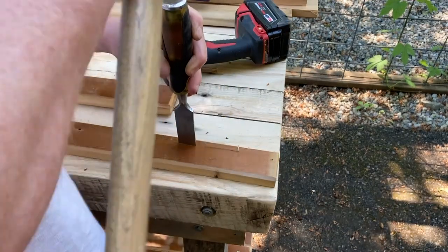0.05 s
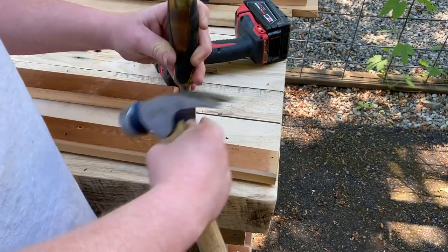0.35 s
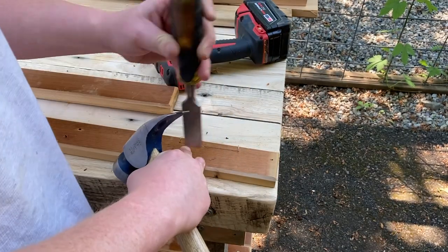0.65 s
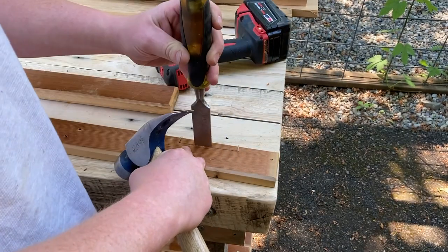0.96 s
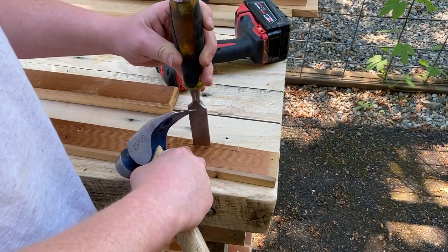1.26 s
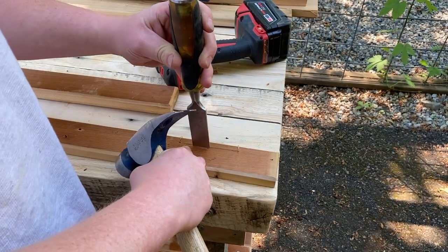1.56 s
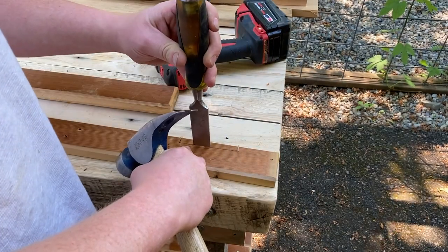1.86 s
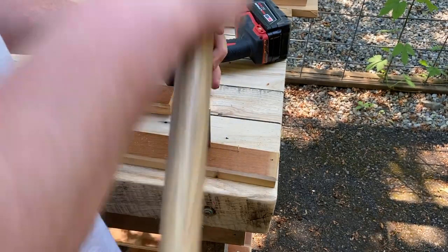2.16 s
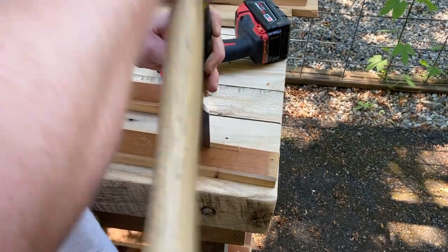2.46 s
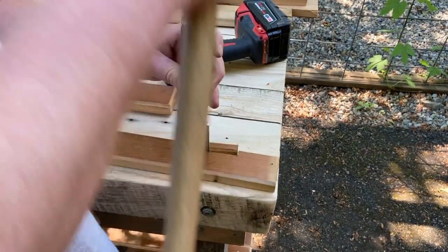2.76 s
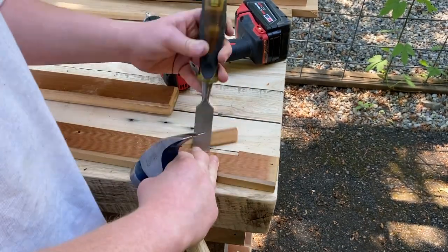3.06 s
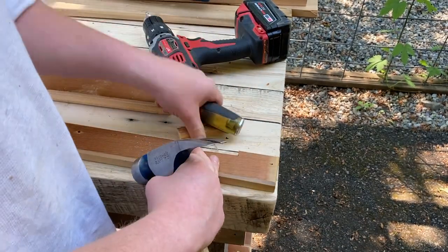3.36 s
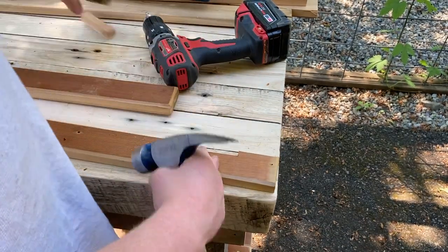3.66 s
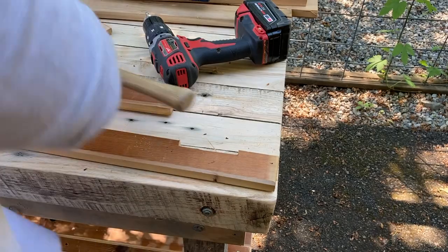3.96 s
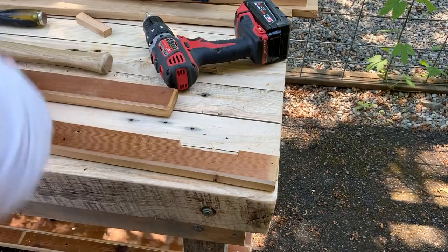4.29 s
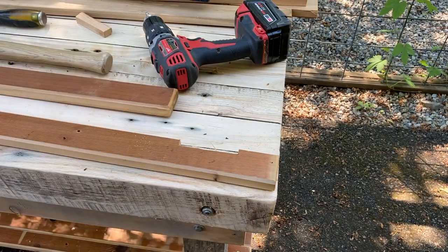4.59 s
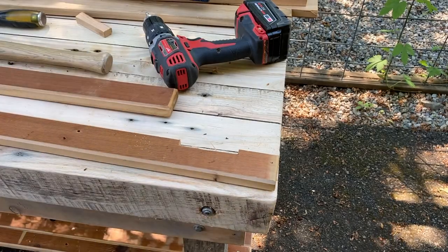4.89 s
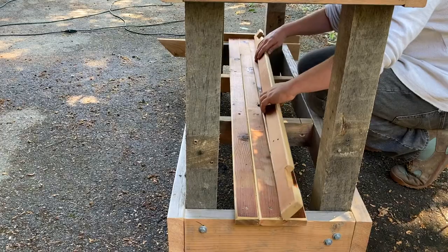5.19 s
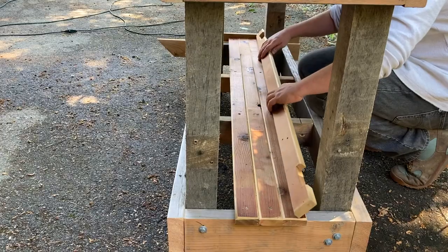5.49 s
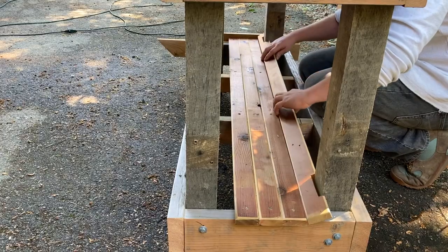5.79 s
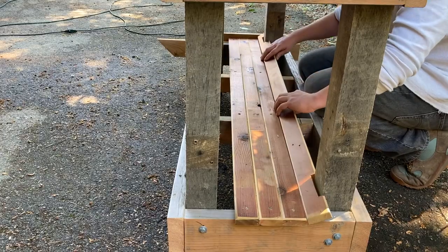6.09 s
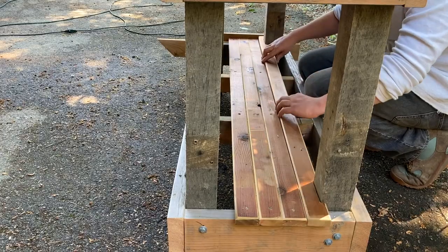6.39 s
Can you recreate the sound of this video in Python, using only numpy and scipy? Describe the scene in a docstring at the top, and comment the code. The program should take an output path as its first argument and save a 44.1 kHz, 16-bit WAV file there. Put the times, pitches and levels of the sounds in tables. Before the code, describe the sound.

Right at the start, a hammer strikes a chisel twice in quick succession, close by, each blow a sharp crack with a slight wooden thud. A low murmur of distant traffic fills the open yard throughout. A very faint engine hums until about 2 seconds, and a far bird gives six quick, faint chirps between 1.2 and 2 seconds. Three more chisel blows come from 2.3 to 2.7 seconds. At 3 seconds a chip snaps off, followed by light ticks of tools touching wood. From 4 to 4.4 seconds the hammer clatters and bounces to rest on planks, with one more click near 4.7. From 5.2 seconds, over a low distant rumble, a board scrapes along a wooden frame in short, gritty shoves, bumping softly at 5.3 and 5.8. It squeaks faintly, then lands with a firm, hollow knock at about 6.4 seconds.

```python
"""Woodwork in a yard

Over a murmur of traffic and a faint engine, a hammer drives a chisel into a batten in two short groups
of blows, exciting the damped modes of blade and bench. A chip snaps off, a far bird calls, the tools are
put down and the hammer rattles to rest on the planks by inelastic bounces. Then, over a distant rumble,
a board slides along a wooden frame with stick-slip friction and is knocked into place."""
import sys
import numpy as np
from scipy import signal
from scipy.fft import rfft, irfft, next_fast_len
from scipy.io import wavfile
from scipy.ndimage import uniform_filter1d, map_coordinates

SR = 44100
rng = np.random.default_rng(int(sys.argv[2]) if len(sys.argv) > 2 else 0)


def transcribe(signal):
    """Save signal, clipped to [-1, 1], as a 16-bit WAV file at the path in sys.argv[1]."""
    frames = np.atleast_2d(signal).T
    limited = np.clip(frames, -1, 1)
    pcm = np.round(limited * 32767).astype(np.int16)
    wavfile.write(sys.argv[1], SR, pcm)


N = 288414
T = np.arange(N) / SR
AGE = T[:SR // 6]  # time since an impact, t/s


def amp(db):
    """Amplitude ratio of a level in decibels; all tabulated levels are relative."""
    return 10 ** (np.asarray(db) / 20)


def unit_rms(x):
    """Normalisation to an rms of 1."""
    return x / np.sqrt(np.mean(x ** 2) + 1e-20)


def unit_impact(x):
    """Normalisation to the energy of 10 ms at an rms of 1."""
    return x / np.sqrt(np.sum(x ** 2) / (SR / 100))


def along(points, hz):
    """Interpolation of (f/Hz, value) points on a logarithmic frequency axis."""
    f, values = np.transpose(points)
    return np.interp(np.log(hz + 1), np.log(f + 1), values)


def curves(rows, t=T):
    """Linear interpolation in time of each column after the first."""
    times, *columns = np.transpose(rows)
    return [np.interp(t, times, column) for column in columns]


def wobble(rate):
    """Smooth random modulation: a spline through `rate` Gaussian values a second."""
    return map_coordinates(rng.standard_normal(int(N * rate / SR) + 4), [T * rate])


def filtered(x, response):
    """Linear filtering: the spectrum is multiplied by a complex frequency response."""
    n = x.shape[-1]
    padded = next_fast_len(n + SR // 5)
    return irfft(rfft(x, padded) * response(np.fft.rfftfreq(padded, 1 / SR)), padded)[..., :n]


def shelf(x, gain_db, corner_hz, order=4):
    """Shelving filter: a gain above the corner, or below it for a negative order."""
    return filtered(x, lambda hz: amp(gain_db / (1 + (corner_hz / (hz + 1)) ** order)))


def add(track, t, x):
    """Superposition of x on the track from time t."""
    part = track[max(round(t * SR), 0):][:len(x)]
    part += x[:len(part)]


def ring(modes, rise_s):
    """Free vibration: damped modes, excited with new strengths and phases by each blow."""
    hz, db, t60 = np.transpose(modes)[:, :, None]
    phase = 2 * np.pi * (hz * AGE + rng.random(hz.shape))
    waves = amp(db + rng.normal(0, 2, hz.shape) - 60 * AGE / t60) * np.sin(phase)
    return unit_impact(waves.sum(0) * (1 - np.exp(-AGE / rise_s)))


def burst(spectrum, rise_s, band_count=18):
    """Modal overlap: dense modes act as noise bands, each with its own decay; low bands rise slower."""
    spectrum = np.asarray(spectrum)
    centres = np.geomspace(70, 16000, band_count)
    hz = np.fft.rfftfreq(len(AGE), 1 / SR) + 1
    bands_away = np.abs(np.log(hz) - np.log(centres)[:, None]) / np.log(centres[1] / centres[0])
    masks = np.sqrt(np.clip(1 - bands_away, 0, 1))
    bands = irfft(rfft(rng.standard_normal(len(AGE))) * masks, len(AGE))
    decay = np.exp(-np.log(1000) * AGE / along(spectrum[:, ::2], centres)[:, None])
    attack = 1 - np.exp(-AGE / (rise_s + 1 / centres[:, None]))
    bands = bands * decay * attack
    gains = amp(along(spectrum[:, :2], centres)) * np.sqrt(centres) / np.linalg.norm(bands, axis=1)
    return unit_impact((gains[:, None] * bands).sum(0))


# Direction cues of the two work places: f/Hz, left-minus-right level/dB, phase lead of the left/rad
AT_BENCH = [(200, .5, -0.1), (700, .5, 0.35), (1300, 4, 0.67), (2390, 4.5, 1.25), (4600, 1.5, 1.65),
            (7400, 1, 2), (10300, 1.2, 2.2), (13600, 0.5, 0.84)]
AT_FRAME = [(200, -.3, 0), (1500, 0.96, 0.5), (4200, 1, 0.76), (4900, 0.76, 2), (6700, 0.27, -8),
            (7050, 0, -6.5), (9260, -0.15, -9.5), (11750, -0.16, -13), (13400, 0, -15.5), (15200, 0, -17.5)]
def localised(x, place, low_cut_hz=70):
    """Localisation: a sound arrives left and right with unequal level and phase, less its deep bass."""
    place = np.asarray(place)
    half = lambda hz: amp(along(place[:, :2], hz) / 2) * np.exp(.5j * along(place[:, ::2], hz))
    low_cut = lambda hz: (1j * hz / (low_cut_hz + 1j * hz)) ** 2
    return filtered(x, lambda hz: low_cut(hz) * np.array([half(hz), 1 / half(hz)]))


# Reverberation time of the yard: f/Hz, T60/s
YARD_DECAY = [(200, 0.27), (1500, 0.38), (6000, 0.44), (15000, .36)]
def yard(x, wet_db):
    """Diffuse reflection from trees and walls, with a new impulse response every third of a second."""
    out, step = np.zeros((2, N + SR * 2)), SR // 3
    for start in range(0, N, step):
        part = x[start:start + step]
        if np.max(np.abs(part)) > np.max(np.abs(x)) / 300:
            hz, t, noise = signal.stft(rng.standard_normal((2, SR // 2)), SR, nperseg=256)
            decay = amp(-60 * t / along(YARD_DECAY, hz)[:, None])
            tail = signal.istft(noise * decay, SR, nperseg=256)[1]
            echo = signal.fftconvolve(part[None], tail / np.linalg.norm(tail[0]), axes=1)
            out[:, start:start + echo.shape[1]] += echo
    return amp(wet_db) * out[:, :N]


# Likeness of left and right in the ambient field: f/Hz, correlation coefficient
CORRELATION = [(60, 0.98), (130, 0.97), (290, 0.97), (640, 0.68), (1410, -0.01), (3100, 0.26),
               (6820, -0.49), (15000, -0.22)]
def ambient_noise(spectrum, patchy_db=2.5):
    """Partial coherence: stereo noise with patches of random gain, nearly in phase in the bass."""
    cells = signal.stft(rng.standard_normal((2, N)), nperseg=512)[2]
    patches = uniform_filter1d(rng.standard_normal(cells.shape[1:]), size=5, axis=0)
    patches = uniform_filter1d(patches, size=12, axis=1)
    pair = signal.istft(cells * amp(patchy_db * unit_rms(patches)), nperseg=512)[1][:, :N]
    angle = lambda hz: np.arccos(np.clip(along(CORRELATION, hz), -1, 1)) / 2
    response = lambda hz: amp(along(spectrum, hz)) * [np.cos(angle(hz)), np.sin(angle(hz))]
    mid, side = filtered(pair, response)
    return unit_rms(np.array([mid + side, mid - side]))


# Swell of the distant traffic: t/s, level/dB
TRAFFIC_SWELL = [(0.0, -54.5), (0.43, -56.5), (1.88, -53.5), (3.82, -60), (3.97, -59), (4.14, -54.5),
                 (4.59, -58.5), (5.15, -54.5)]
# Spectra of the outdoor murmur and of the rumble near the ground: f/Hz, spectral level/dB
MURMUR_SPECTRUM = [(15, -88.5), (25, -59), (58, -24), (74, -18), (108, -3.5), (197, -6), (238, -6),
                   (296, -15), (422, -15.5), (669, -20.5), (787, -25), (902, -24), (7510, -42.5),
                   (14000, -52), (16500, -52)]
RUMBLE_SPECTRUM = [(12, -35), (20, -20.5), (84, 5), (129, -14), (192, -19), (215, -33), (321, -24),
                   (499, -33), (600, -51), (780, -61), (1320, -120)]
def background(air_db=-54.5, bass_swell=0.97, hiss_swell=0.25, rumble_db=-49, rumble_start_s=5.18):
    """Ambient noise: air and distant traffic swell mostly in the bass; a rumble joins later."""
    level_db, = curves(TRAFFIC_SWELL)
    swell_db = level_db - level_db.mean()
    air = amp(air_db) * ambient_noise(MURMUR_SPECTRUM)
    bass = filtered(air, lambda hz: 1 / (1 + (hz / 600) ** 2))
    murmur = amp(bass_swell * swell_db) * bass + amp(hiss_swell * swell_db) * (air - bass)
    return murmur + amp(rumble_db) * (T > rumble_start_s) * ambient_noise(RUMBLE_SPECTRUM)


# Hammer blows on the chisel: t/s, level/dB, bench thud level/dB, treble gain/dB
BLOWS = [(0.02, -11, -29, -2.5), (0.161, -12.5, -27.5, 1), (2.35, -13.5, -34, -4), (2.507, -15, -31.5, 0.5),
         (2.651, -15.5, -37, -1)]
# Contact noise of a light touch and of the edge biting: f/Hz, spectral level/dB, T60/s
SNAP_SPECTRUM = [(200, -2.5, 0.12), (816, -1.5, 0.053), (2250, -3, 0.044), (4830, -7, 0.017),
                 (10100, -7.5, 0.039), (15000, -7, 0.013)]
CRACK_SPECTRUM = [(147.5, -9.5, .07), (500, -2.5, 0.21), (900, -3.5, 0.14), (1500, -2.5, .06),
                  (2398, -4, 0.037), (5040, -6.5, 0.066), (8100, -4, 0.05), (11200, -18, 0.077),
                  (15000, -9.5, 0.037)]
# Modes of the steel blade and of the bench: f/Hz, level/dB, T60/s
BLADE_MODES = [(3835, -1.5, 0.019), (4293, -7.5, 0.024), (5450, 4.5, 0.012), (8380, -8.5, 0.052),
               (10800, -25, 0.079)]
BENCH_MODES = [(112, -8.5, 0.057), (193, -2, .09), (234.5, -7.5, 0.081), (308.3, -6.5, 0.067),
               (387, -9.5, 0.042), (596, -3, 0.054), (752, -8, 0.071), (854, -4, 0.054), (1740, -18, 0.071),
               (2194, -7.5, 0.052), (2300, -14, 0.083)]
def chisel(touch_db=-23, crack_db=-16, blade_db=-18, thud_db=2.5, bite_lag_s=0.0018, thud_lag_s=0.004):
    """Impulse transmission: the hammer meets the handle, the edge bites, the push reaches the bench."""
    cracks, rings = np.zeros(N), np.zeros(N)
    spike = 1 + 4.3 * np.exp(-AGE / 0.0021)
    for t, db, bench_db, treble_db in BLOWS:
        bite = amp(db + crack_db) * burst(CRACK_SPECTRUM, rise_s=0.0013) * spike
        add(cracks, t, amp(db + touch_db) * burst(SNAP_SPECTRUM, rise_s=0.00044))
        add(cracks, t + bite_lag_s, shelf(bite, treble_db, corner_hz=5000))
        add(rings, t + bite_lag_s, amp(db + blade_db) * ring(BLADE_MODES, rise_s=0.0004))
        add(rings, t + thud_lag_s, amp(bench_db + thud_db) * ring(BENCH_MODES, rise_s=0.0047))
    return localised(cracks + rings, AT_BENCH) + yard(cracks, wet_db=-20)


def far_engine(level_db=-58, start_s=0.1942, end_s=2.2, fade_s=0.27, start_hz=242.4, rise_hz_per_s=16):
    """Amplitude and frequency modulation: a far engine's hum wavers, rises slowly and fades."""
    fade = np.clip(np.minimum(T - start_s, end_s - T) / fade_s, 0, 1)
    hz = (start_hz + rise_hz_per_s * (T - start_s)) * (1 + 0.012 * wobble(25))
    return fade * amp(level_db + 2 * wobble(9.9)) * np.sin(2 * np.pi * np.cumsum(hz) / SR)


# The chip splitting off, tools touching wood, and a last faint click just before the rumble begins:
# t/s, level/dB, hardness as treble gain/dB, f/Hz
TICKS = [(0.47, -33.5, -37, 696), (0.61, -52, -12, 708), (2.03, -49.5, -11.5, 2740), (3.04, -30, -6, 6760),
         (3.053, -20.5, -14, 797), (3.107, -42, 4.5, 740), (3.379, -49.5, -0.5, 2540),
         (3.407, -40.5, -39, 557), (3.7, -24, -15, 2150), (3.745, -39, -24, 2260), (4.727, -36, -24, 883),
         (4.737, -29, -5.5, 4360), (4.968, -41, -18.5, 700), (5.144, -45.5, -8.5, 890)]
def ticks(level_db=-13, bright_db=9, body_db=-10, thinning=0.45, ring_db=-3, ring_t60=0.042):
    """Spectral tilt: harder ticks are brighter and thinner; each rings in three close modes."""
    snaps, rings = np.zeros(N), np.zeros(N)
    for t, db, treble_db, hz in TICKS:
        snap = shelf(burst(SNAP_SPECTRUM, rise_s=0.0001), treble_db + bright_db, corner_hz=7300)
        bass_db = min(body_db - thinning * treble_db, 0)
        add(snaps, t, amp(db + level_db) * shelf(snap, bass_db, corner_hz=2100, order=-4))
        cluster = [(hz * ratio, 0, ring_t60) for ratio in (0.87, 1, 1.12)]
        add(rings, t, amp(db + level_db + ring_db) * ring(cluster, rise_s=0.0001))
    return localised(snaps + rings, AT_BENCH) + yard(snaps, wet_db=-17)


# The bird's calls: t/s at mid note, level/dB
CHIRPS = [(1.176, -52), (1.322, -52), (1.485, -50.5), (1.66, -51), (1.844, -51), (2.032, -51.5)]
# Contours of its two voices: t/s from mid note, f/Hz, level/dB
LOWER_VOICE = [(-.03, 2100, -33), (-.019, 2465, -11), (-.011, 2616, -0.5), (-.002, 2856, -8),
               (.007, 2780, -2.5), (.014, 2455, -8.5), (.022, 2520, -31.5)]
UPPER_VOICE = [(-.034, 3194, -33.5), (-.026, 3160, -8), (-.017, 3700, -22), (0, 3700, -18.5),
               (0.019, 3300, -20.5), (.026, 3124, -8), (.038, 3210, -28)]
def bird(level_db=-1, rasp=0.022, echo_s=0.042):
    """Biphonation: a far bird repeats one arched note with both sides of its syrinx."""
    out = np.zeros(N)
    for voice in (LOWER_VOICE, UPPER_VOICE):
        start, end = voice[0][0], voice[-1][0]
        hz, shape_db = curves(voice, np.arange(start, end, 1 / SR))
        flutter = 1 + rasp * wobble(400)
        for t, db in CHIRPS:
            pitch = hz * flutter[round(t * SR):][:len(hz)]
            tone = np.sin(2 * np.pi * np.cumsum(pitch) / SR)
            add(out, t + start, amp(db + shape_db + level_db) * tone)
    out += amp(-10.5) * np.roll(out, round(echo_s * SR))  # reflection from a nearby wall
    return out + yard(out, wet_db=-1)


# Landings of the hammer's handle, neck and two sides of the head:
# t/s, level/dB, treble gain/dB, bass gain/dB, first flight/s, loss per bounce/dB, number of contacts
LANDINGS = [(3.985, -16.5, -28.5, -24, 0.021, 3.5, 4), (3.9903, -15.5, -40, -18.5, .0435, 2, 10),
            (4.2183, -11.5, -19, -15, .029, 6.5, 6), (4.2243, -11.5, -16.5, -16, .015, 13, 2)]
def bounces(rocking_s=0.0122, restitution=0.53):
    """Inelastic collision: contacts weaken and flights shorten towards a steady rocking period."""
    for t, db, treble_db, bass_db, flight_s, loss_db, contacts in LANDINGS:
        for k in range(round(contacts)):
            yield t, db - loss_db * k, treble_db, bass_db
            t = t + rocking_s + (flight_s - rocking_s) * restitution ** k


# Contact noise of the hammer on the planks: f/Hz, spectral level/dB, T60/s
CLACK_SPECTRUM = [(120, -30, 0.033), (250, -12, 0.044), (450, -5.5, 0.053), (734, -3.5, 0.056),
                  (1390, -10, 0.057), (2580, -5, 0.045), (4500, -12, 0.046), (9050, -21.5, 0.047),
                  (15000, -28, .016)]
# Modes of the planks: f/Hz, level/dB, T60/s
PLANK_MODES = [(247.3, 1, 0.07), (600, -6.5, 0.076), (770, 4.5, 0.025), (1050, -26, 0.04),
               (1333, 7.5, 0.021), (1540, -4.5, 0.079), (1730, -14, 0.062), (1863, 1, 0.029),
               (2800, -29, 0.043)]
def hammer_laid_down(clack_db=-13.3, planks_db=-11.5, bright_db=14, heavy_db=11):
    """Impact excitation: each bounce of handle or head clacks and sets the planks ringing."""
    out = np.zeros(N)
    for t, db, treble_db, bass_db in bounces():
        clack = amp(db + clack_db) * burst(CLACK_SPECTRUM, rise_s=0.00027)
        planks = amp(db + planks_db) * ring(PLANK_MODES, rise_s=0.00066)
        hit = shelf(clack + planks, bass_db + heavy_db, corner_hz=483, order=-4)
        add(out, t, shelf(hit, treble_db + bright_db, corner_hz=3300))
    return localised(out, AT_BENCH) + yard(out, wet_db=-26)


# Shoves of the board: t/s, duration/s, rub level/dB, grit level/dB
SHOVES = [(5.174, 0.15, -46, -60.5), (5.355, 0.25, -51.5, -62), (5.525, 0.038, -48, -53),
          (5.628, 0.036, -43.5, -55), (5.732, 0.04, -49.5, -55.5), (5.789, 0.011, -38, -44.5),
          (6.13, 0.256, -62.5, -70.5), (6.348, 0.08, -47.5, -48.5), (6.43, 0.12, -51.5, -63)]
def shove_envelopes(attack_share=0.34, longest_attack_s=0.026, release_db_per_s=351):
    """Incoherent addition: shoves build up, hold and die away, summing in power for rub and for grit."""
    force, hiss = np.zeros(N), np.zeros(N)
    for t, duration, rub_db, grit_db in SHOVES:
        attack = np.clip((T - t) / min(attack_share * duration, longest_attack_s), 0, 1)
        shape = attack * amp(-release_db_per_s * np.maximum(T - t - duration, 0))
        force = np.hypot(force, amp(rub_db) * shape)
        hiss = np.hypot(hiss, amp(grit_db) * shape)
    return force, hiss


# Course of the squeak: t/s, f/Hz, level/dB
SQUEAK_CONTOUR = [(6.12, 1914, -95), (6.15, 1900, -58.5), (6.25, 2030, -63.5), (6.32, 2020, -66),
                  (6.4, 2040, -72)]
# Its partials: frequency ratio, level/dB
SQUEAK_PARTIALS = [(1, 3), (1.5, -12), (2.57, -22)]
def board_squeak(level_db=-2, jitter=0.0305, flicker_db=3.4):
    """Friction-induced oscillation: under light pressure the board gives an unsteady tone."""
    hz, db = curves(SQUEAK_CONTOUR)
    phase = 2 * np.pi * np.cumsum(hz * (1 + jitter * wobble(500))) / SR
    partials = sum(amp(level) * np.sin(ratio * phase) for ratio, level in SQUEAK_PARTIALS)
    started = T > SQUEAK_CONTOUR[0][0]
    return amp(db + level_db + flicker_db * wobble(80)) * partials * started


# Friction noise of wood and of grit: f/Hz, spectral level/dB
RUB_SPECTRUM = [(120, -25.5), (200, -0.5), (274, 2.5), (519, -5.5), (590, -11), (652, -35), (741, -3),
                (1040, -12), (1350, -10.5), (1920, -16), (6000, -32), (7800, -39), (13200, -120)]
GRIT_SPECTRUM = [(2500, -1), (4000, -7), (5500, -12), (7500, 1), (11000, 2), (13000, -2), (15800, -1.5)]
# Resonances of the rubbed board: f/Hz, bandwidth/Hz, level/dB
RUBBED_MODES = [(592, 20, -9), (734, 16, -6), (980, 49, -8), (1400, 76, 1), (1724, 105, 1), (2107, 53, -7),
                (2490, 150, 0), (2870, 120, -12), (4060, 140, -14)]
def board_slide(rub_db=-3, ring_db=-4, catch_db=1.5, grain_db=2.5):
    """Stick-slip friction: the board catches and slips on grit, which drives its resonances."""
    force, hiss = shove_envelopes()
    catching = amp(catch_db * wobble(70))
    grains = unit_rms(amp(grain_db * wobble(1500)) * rng.standard_normal(N))
    scrape = lambda spectrum: catching * unit_rms(filtered(grains, lambda hz: amp(along(spectrum, hz))))
    modes = [(hz, db, np.log(1000) / (np.pi * width)) for hz, width, db in RUBBED_MODES]
    body = ring(modes, rise_s=0.0019)
    drive = amp(ring_db) * force * catching * grains
    hollow = signal.fftconvolve(drive, body / np.linalg.norm(body))[:N]
    wood = amp(rub_db) * force * scrape(RUB_SPECTRUM) + hollow
    grit = hiss * scrape(GRIT_SPECTRUM)
    return localised(wood + grit + board_squeak(), AT_FRAME) + yard(wood, wet_db=-13)


# Bumps of the board on the frame: t/s, level/dB, bass gain/dB, grit level/dB, number of contacts
BUMPS = [(5.309, -24.5, 3.5, -61, 3), (5.76, -21.5, -10.5, -56, 1), (5.794, -21.5, -6.5, -35.5, 3),
         (6.429, -6.5, -23.5, -53, 1), (6.438, -16.5, -13, -61, 1)]
def judders(interval_s=0.0205, loss_db=2.5, grit_loss_db=20):
    """Rebound: a bumped board judders against the frame; the first contact crushes most of the grit."""
    for t, db, bass_db, grit_db, contacts in BUMPS:
        for k in range(round(contacts)):
            yield t + interval_s * k, db - loss_db * k, bass_db, grit_db - grit_loss_db * k


# Contact noise of wood on wood: f/Hz, spectral level/dB, T60/s
KNOCK_SPECTRUM = [(80, -16, 0.16), (293, 2, 0.147), (660, 1.5, 0.12), (1240, -12.5, 0.088),
                  (2300, -20.5, 0.044), (5000, -39, 0.076), (15000, -46, .04)]
# Modes of the struck board: f/Hz, level/dB, T60/s
BOARD_MODES = [(157, -6, 0.13), (289.4, 1.5, 0.093), (400.8, -4, 0.17), (518, -15, 0.11), (601.4, 2, 0.13),
               (761.6, 3.5, 0.084), (832, -6.5, 0.07), (922.4, -4.5, 0.11), (1080, -14.5, 0.14),
               (1308, -4, 0.078), (1686, -13, 0.074), (2200, -13, 0.075)]
def board_bumps(knock_db=-11, ring_db=-9, thump_db=9, crunch_db=-2, crunch_t60=0.04):
    """Compliant impact: wood meets wood with a soft, hollow knock, crushing the grit between."""
    out = np.zeros(N)
    for t, db, bass_db, grit_db in judders():
        knock = amp(db + knock_db) * burst(KNOCK_SPECTRUM, rise_s=0.0051)
        board = amp(db + ring_db) * ring(BOARD_MODES, rise_s=0.0022)
        hit = shelf(knock + board, bass_db + thump_db, corner_hz=367, order=-4)
        crunch = burst([(hz, level, crunch_t60) for hz, level in GRIT_SPECTRUM], rise_s=0.00093)
        add(out, t, hit + amp(grit_db + crunch_db) * crunch)
    return localised(out, AT_FRAME) + yard(out, wet_db=-21)


def scene():
    """Superposition: bench work, then the board, amid the sounds of the open air."""
    at_bench = chisel() + ticks() + hammer_laid_down()
    at_frame = board_bumps() + board_slide()
    return at_bench + at_frame + bird() + far_engine() + background()


def record(dry):
    """Band limiting: the response falls to zero over 400 Hz centred on 16 kHz."""
    return filtered(dry, lambda hz: np.clip((16000 - hz) / 400 + 0.5, 0, 1))


dry = scene()
out = record(dry)
transcribe(out)
```